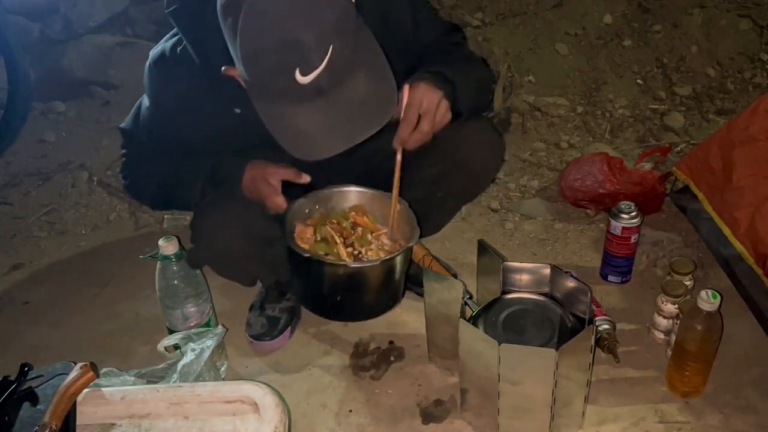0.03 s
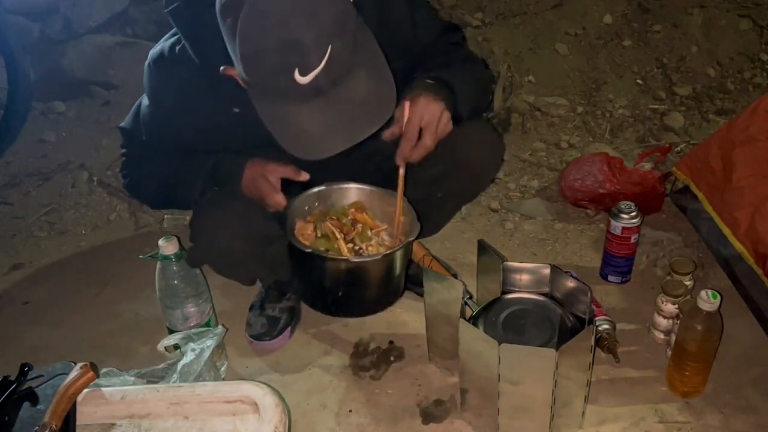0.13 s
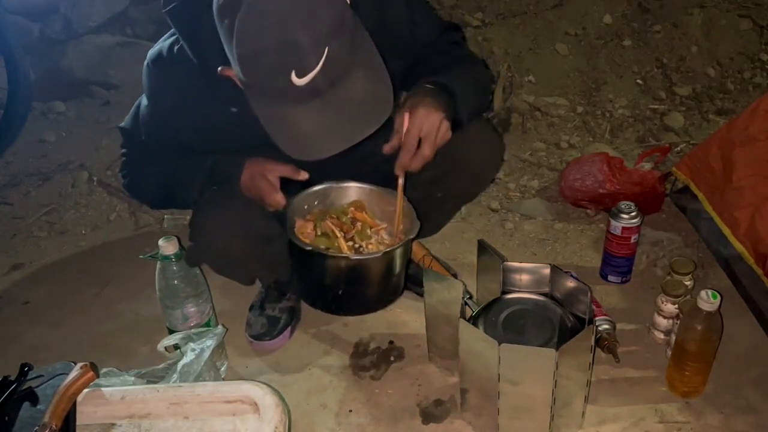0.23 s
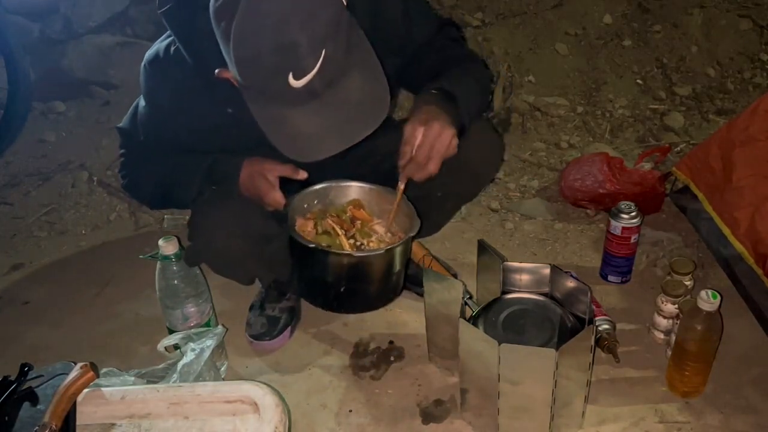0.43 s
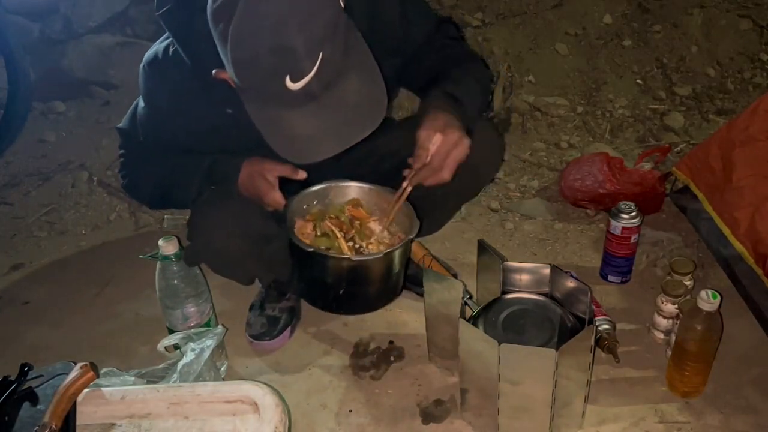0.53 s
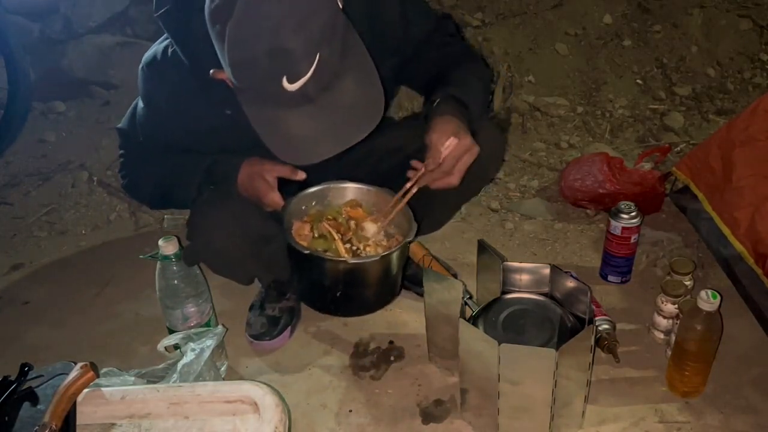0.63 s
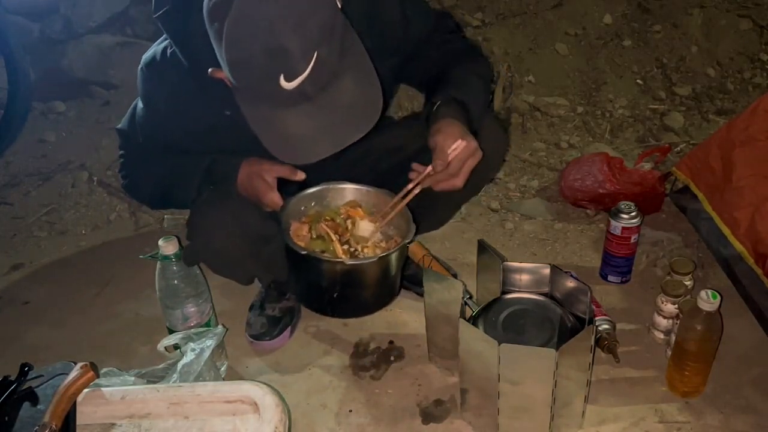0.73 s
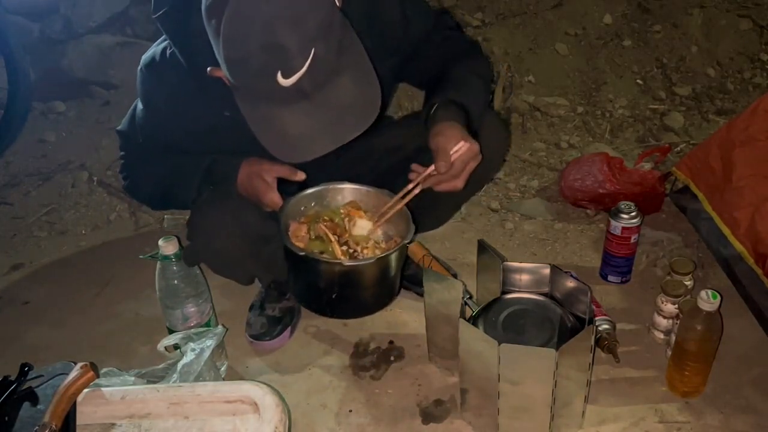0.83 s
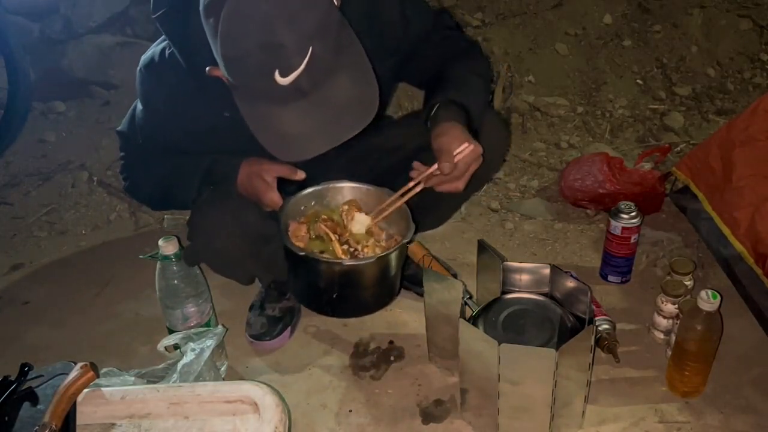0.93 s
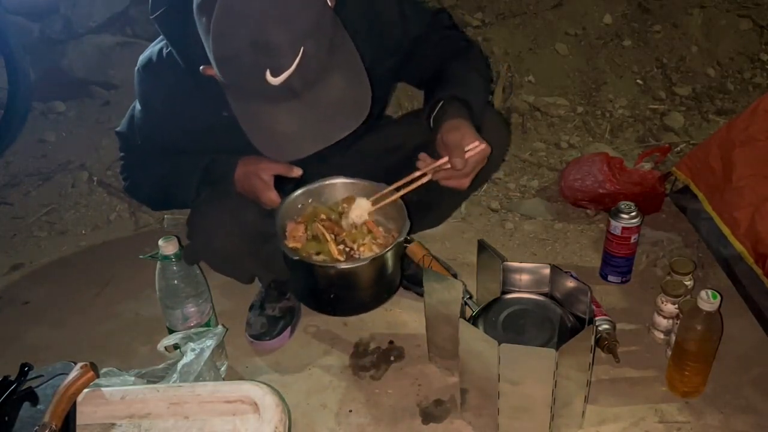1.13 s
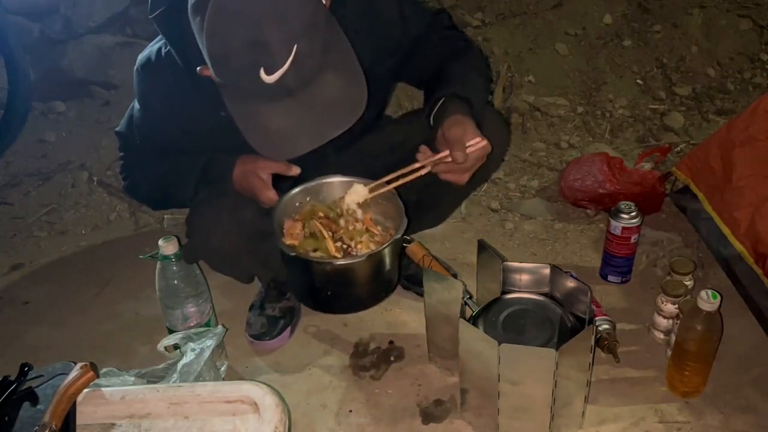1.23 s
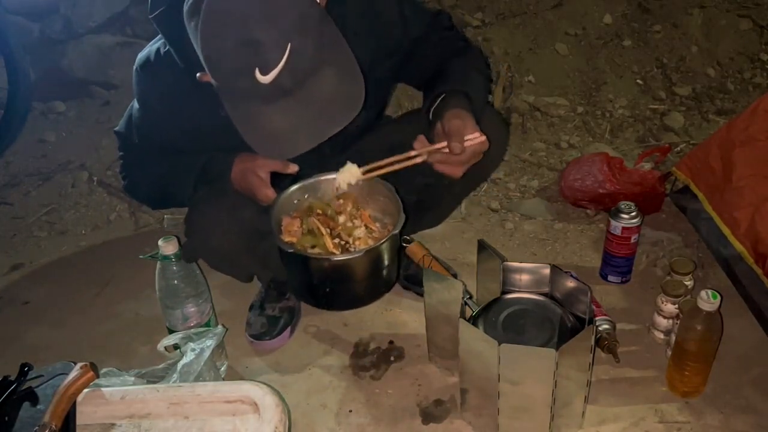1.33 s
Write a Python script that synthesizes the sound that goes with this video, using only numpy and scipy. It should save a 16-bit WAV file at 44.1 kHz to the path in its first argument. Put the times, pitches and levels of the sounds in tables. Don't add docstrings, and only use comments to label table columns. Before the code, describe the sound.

Close outdoor stereo pickup of chopsticks digging in a full pot; one strong damped knock after a quarter second, softer thuds and moist pops following, tiny ticks near the end, constant soft burner rumble and hiss underneath.

```python
import sys
import numpy as np
from scipy import signal
from scipy.fft import rfft, irfft
from scipy.io import wavfile
from scipy.ndimage import uniform_filter1d

SR = 44100
rng = np.random.default_rng(int(sys.argv[2]) if len(sys.argv) > 2 else 0)


def gain_from_db(level_db):
    decades = np.asarray(level_db, float) / 20
    return 10 ** decades


def generate_wav(sig):
    pcm = np.round(np.clip(np.atleast_2d(sig).T, -1, 1) * 32767).astype(np.int16)
    wavfile.write(sys.argv[1], SR, pcm)


N = 61739
TIME_S = np.arange(N) / SR
FREQ_HZ = np.fft.rfftfreq(N, 1 / SR)

# (time [s], level [dB])
SURGES = [(0, 3.5), (.15, -1.5), (.2, 0), (.25, 6.5), (.275, 6.5), (.31, 2.5), (.38, -2), (.42, 5),
          (.47, 0.5), (.555, 0.5), (0.569, 5.5), (.73, 0), (.75, 4), (.85, -0.5), (0.889, 4.5), (.925, 4.5),
          (.98, 1.5), (1.4, 3)]
# (pitch [Hz], width [Hz], level [dB], left over right [dB], right port ahead [radians])
WINDSHIELD = [(176, 109, 2, -0.5, -0.25), (289, 90, -2.5, -2, -0.5), (448, 137, -1, -3.5, 0.21),
              (600, 120, -4.5, -6, 0.68), (1960, 260, -11.5, -5, 0.81), (2245, 310, -16, -1.5, .5),
              (2950, 134, -18.5, -1, -1), (3368, 167, -17.5, 0.5, 0.48), (5000, 570, -25.5, 0.5, 3),
              (5600, 400, -19, 1.5, 3), (7630, 480, -27.5, 4.5, 3.5), (8420, 540, -25.5, 2, -3.5),
              (9570, 390, -28.5, -3, -2), (10460, 370, -35, -8, 1)]
# (frequency [Hz], level per hertz [dB])
AIR_COLOUR = [(40, 4.5), (90, 4.5), (600, -6), (1000, -15.5), (1500, -17.5), (4200, -16.5), (7000, -18.5),
              (13500, -32)]
# (centre [Hz], width [Hz], depth [0 to 1])
SHARED_DIP = (7910, 340, 0.76)
DIFFERENCE_DIP = (6400, 300, .75)
# (time [s], level [dB], rise [ms])
BUMPS = [(.2326, -31, 10), (.2762, -35.5, 16), (.3140, -20.7, 11), (.4372, -35, 11), (.4395, -38, 17),
         (.4305, -39, 7), (.5718, -43, 11), (.02, -48, 18), (.1044, -46, 14), (.3739, -46, 14),
         (.7476, -47, 16), (.845, -45, 18), (.9394, -48, 12), (1.035, -50, 24), (1.2279, -48, 12),
         (1.3, -46, 20), (1.352, -48, 16)]
# (time [s], level [dB], pitch [Hz])
POPS = [(.397, -47, 1200), (.842, -43, 2950), (.354, -52, 3850), (.034, -42, 2350), (.035, -47, 3200),
        (.923, -40, 2000), (.3152, -34, 410), (.2592, -41, 4800), (.2612, -38, 4750), (.2640, -38, 5300),
        (1.3478, -47, 4800), (1.3503, -47, 5300), (.4330, -42, 330)]
# (time [s], level [dB], brightness [dB per octave])
TICKS = [(.2580, -41, 5), (.2600, -36, 5), (.2614, -31, 4), (.2631, -33, 2), (.26405, -20, 0),
         (.26477, -29, 2), (.2668, -35, 3), (.2690, -40, 4), (.2702, -38, -2), (.2709, -37, 2),
         (1.3484, -39, 5), (1.3506, -38, 2), (1.3514, -40, 2)]
# (pitch [Hz], level [dB], time to fall 60 dB [s])
POT_TONES = [(2750, -11, .006), (3080, -6, .006), (3500, -13, .004), (3850, -4, .005), (4170, 0, .005),
             (4700, -6, .005), (5170, -7, .007), (5660, -8, .007), (6280, -17, .005), (6920, -16, .006),
             (7450, -18, .006), (9160, -26, .005), (10300, -17, .005), (12600, -25, .004)]
# (time [s], length [s], level [dB], lowest [Hz], highest [Hz])
SCRAPE = (.2768, .0032, -57, 9300, 12200)
# (lowest [Hz], highest [Hz])
JOINED_BAND = (10900, 13600)

FLAME_DB, FLICKER_DB, FLICKER_PER_S = -47.5, 1.5, 30
FLAME_SURGE_SHARE = 0.56
LULL_S, LULL_LENGTH_S, LULL_DB = 0.268, 0.027, -9
AIR_DB, ALIKE_BELOW_HZ = -54.5, 460
PORT_SHARE = 0.65
TURNS_PER_E, CREST_MS = 1.36, 9.0
BUMP_SHARPNESS, GROUND_TOP_HZ = 1.92, 900
BUMP_PAN_DB, BUMP_LAG_S = -0.6, 0.00013
POP_T60_S, POP_RISE_S = 0.022, 0.00068
TICK_RISE_S, POT_LOW_HZ = 0.0004, 2400
POT_PAN_DB, POT_LAG_S = 2, 0.00006
MIC_LOW_HZ, MIC_TOP_HZ = 46.4, 14300


def unit(x):
    return x / np.sqrt(np.mean(x ** 2))


def flicker():
    hold = int(SR / FLICKER_PER_S)
    steps = np.repeat(rng.standard_normal(N // hold + 1), hold)
    smooth = uniform_filter1d(uniform_filter1d(steps, hold), hold)
    return 1.4 * smooth[:N]


def flame(surge_db):
    f = FREQ_HZ + 1
    lull_db = LULL_DB * np.exp(-((TIME_S - LULL_S) / LULL_LENGTH_S) ** 2)
    out = 0
    for hz, width, db, pan_db, lead in WINDSHIELD:
        resonance = 1 / (1 + ((f * f - hz * hz) / (f * width)) ** 2 / 2)
        band = rfft(rng.standard_normal(N)) * resonance
        left = irfft(band, N) * gain_from_db(pan_db / 2)
        right = irfft(band * np.exp(1j * lead), N) * gain_from_db(-pan_db / 2)
        change_db = surge_db if hz > 1000 else lull_db
        out = out + np.array([left, right]) * gain_from_db(db + change_db + FLICKER_DB * flicker())
    return unit(out) * gain_from_db(FLAME_DB)


def housing_dip(f, hz, width, depth):
    return 1 - np.clip(depth, 0, 1) * np.exp(-((f - hz) / width) ** 2)


def air(surge_db):
    f = FREQ_HZ + 1
    colour_hz, colour_db = np.array(AIR_COLOUR).T
    colour = gain_from_db(np.interp(np.log(f), np.log(colour_hz), colour_db)) * np.minimum(f / 40, 1) ** 2
    shared = rfft(rng.standard_normal(N)) * colour
    own = rfft(rng.standard_normal(N)) * colour
    share = np.clip(PORT_SHARE, 0, 1) / (1 + (3500 / f) ** 4)
    difference = 1j * share * shared + np.sqrt(1 - share ** 2) * own
    difference = difference / np.sqrt(1 + (ALIKE_BELOW_HZ / np.maximum(f, 200)) ** 2)
    shared = shared * housing_dip(f, *SHARED_DIP)
    difference = difference * housing_dip(f, *DIFFERENCE_DIP)
    pair = np.array([shared + difference, shared - difference])
    treble = 1 / (1 + (1500 / f) ** 2)
    steady = irfft(pair * (1 - treble), N)
    surging = irfft(pair * treble, N) * gain_from_db(surge_db)
    return unit(steady + surging) * gain_from_db(AIR_DB)


def ports(x, pan_db, lag_s):
    left = irfft(rfft(x) * np.exp(-2j * np.pi * FREQ_HZ * lag_s), N)
    return np.array([left * gain_from_db(pan_db / 2), x * gain_from_db(-pan_db / 2)])


def bumps():
    out = 0
    for at, db, rise_ms in BUMPS:
        age_ms = np.maximum(1000 * (TIME_S - at), 1e-3)
        swell = (age_ms / rise_ms * np.exp(1 - age_ms / rise_ms)) ** BUMP_SHARPNESS
        wave = np.cos(2 * np.pi * TURNS_PER_E * np.log(age_ms / CREST_MS))
        out = out + gain_from_db(db) * swell * wave
    ground = signal.butter(2, GROUND_TOP_HZ, fs=SR, output="sos")
    return ports(signal.sosfiltfilt(ground, out), BUMP_PAN_DB, BUMP_LAG_S)


def ring(at, hz, t60, rise_s):
    age = np.maximum(TIME_S - at, 0)
    fade = np.exp(-np.log(1000) * age / t60)
    return np.sin(2 * np.pi * hz * age) * fade * (1 - np.exp(-age / rise_s))


def pops():
    out = 0
    for at, db, hz in POPS:
        out = out + gain_from_db(db) * ring(at, hz, POP_T60_S, POP_RISE_S)
    return ports(out, POT_PAN_DB, POT_LAG_S)


def ticks():
    out = 0
    for at, db, tilt_db in TICKS:
        for hz, tone_db, t60 in POT_TONES:
            level_db = db + tone_db + tilt_db * np.log2(hz / 4000)
            out = out + gain_from_db(level_db) * ring(at, hz, t60, TICK_RISE_S)
    thin = signal.butter(3, POT_LOW_HZ, "high", fs=SR, output="sos")
    return ports(signal.sosfilt(thin, out), POT_PAN_DB, POT_LAG_S)


def scrape():
    at, length, db, low_hz, high_hz = SCRAPE
    band = signal.butter(3, (low_hz, high_hz), "band", fs=SR, output="sos")
    hiss = signal.sosfilt(band, rng.standard_normal(N))
    return unit(hiss) * gain_from_db(db) * np.exp(-((TIME_S - at) / length) ** 2)


def scene():
    surge_db = np.interp(TIME_S, *np.array(SURGES).T)
    stove = flame(FLAME_SURGE_SHARE * surge_db) + air(surge_db)
    return stove + bumps() + pops() + ticks() + scrape()


def low_pass(x):
    return signal.sosfilt(signal.butter(12, 14320, fs=SR, output="sos"), x)


def record(dry):
    f = FREQ_HZ + 1
    mid = rfft(dry[0] + dry[1]) / 2
    side = rfft(dry[0] - dry[1]) / 2
    mid = mid / (1 + (MIC_LOW_HZ / f) ** 4) / (1 + (f / MIC_TOP_HZ) ** 40)
    side = side * ((f < JOINED_BAND[0]) | (f > JOINED_BAND[1]))
    mid, side = irfft(mid, N), irfft(side, N)
    return low_pass(np.array([mid + side, mid - side]))


dry = scene()
out = record(dry)
generate_wav(out)
```